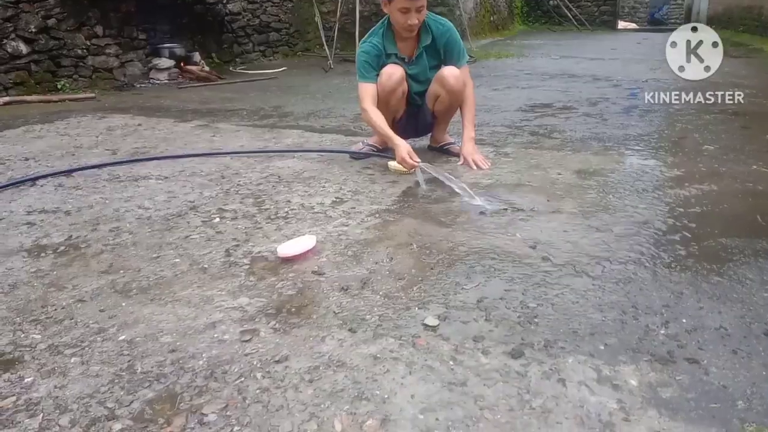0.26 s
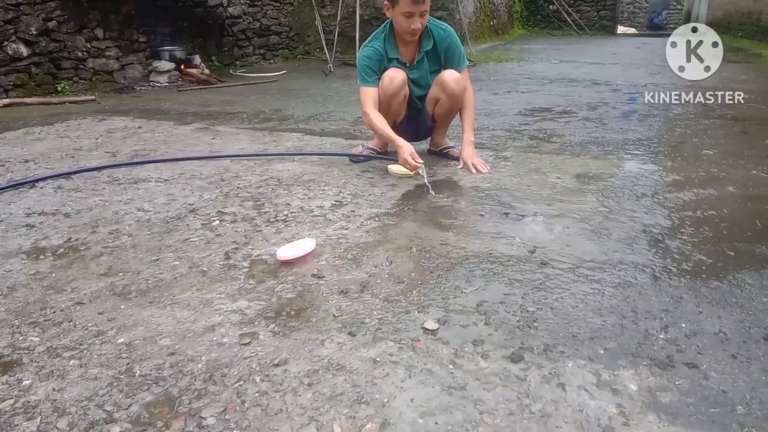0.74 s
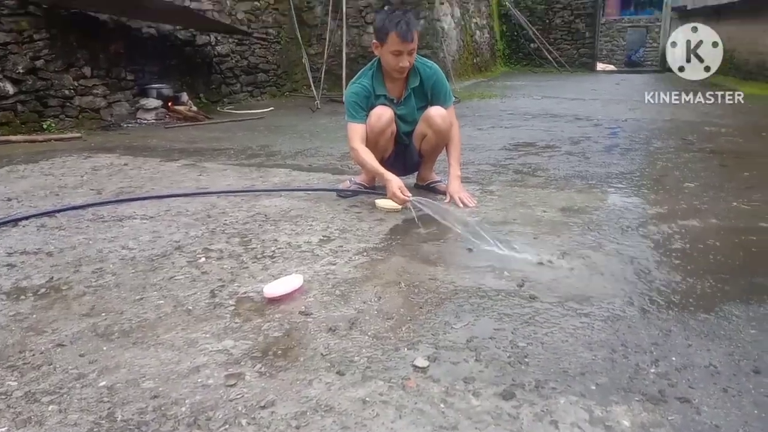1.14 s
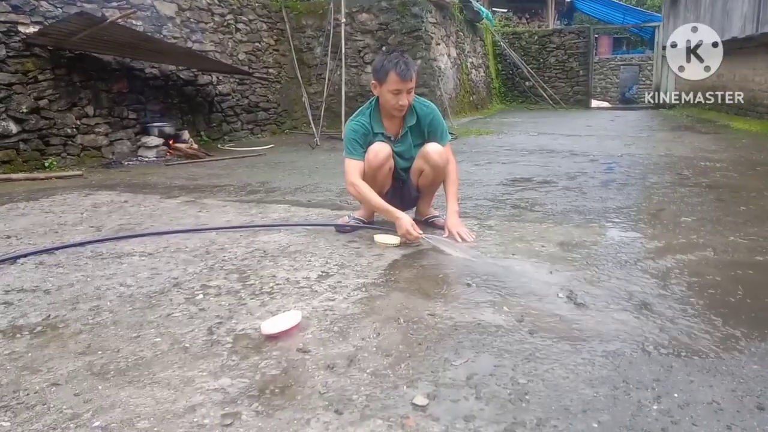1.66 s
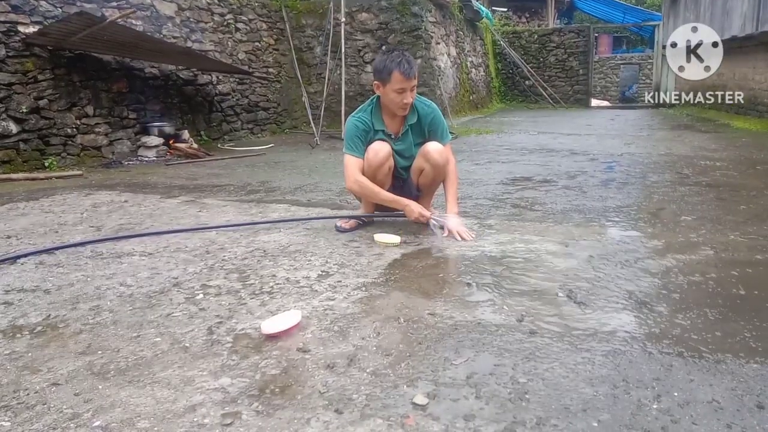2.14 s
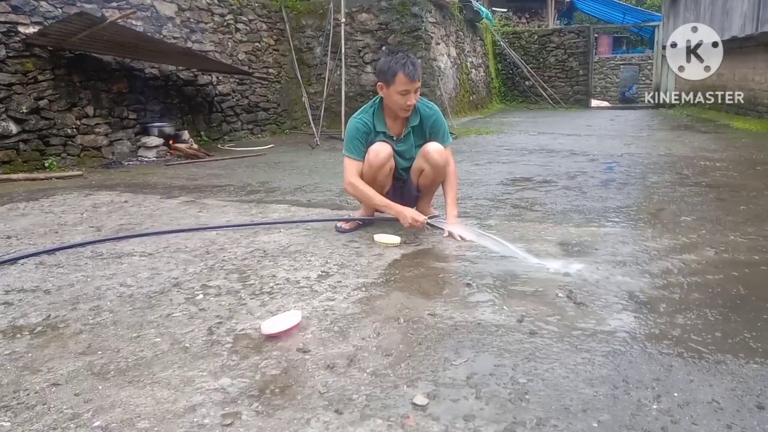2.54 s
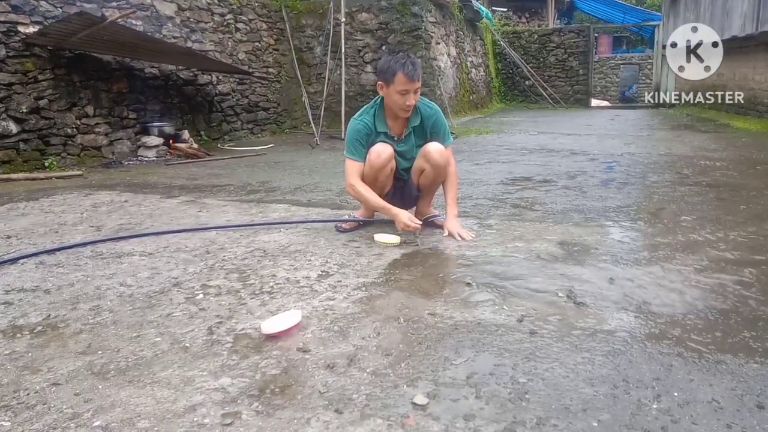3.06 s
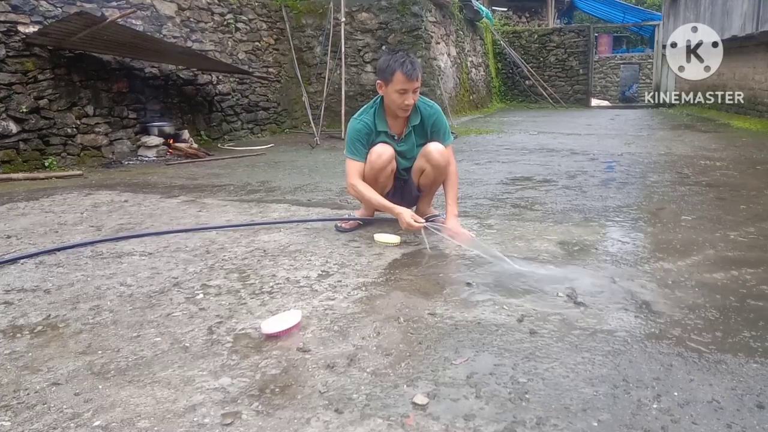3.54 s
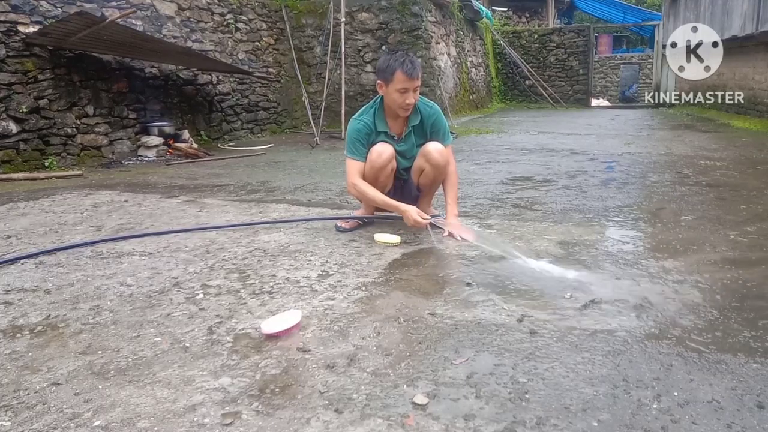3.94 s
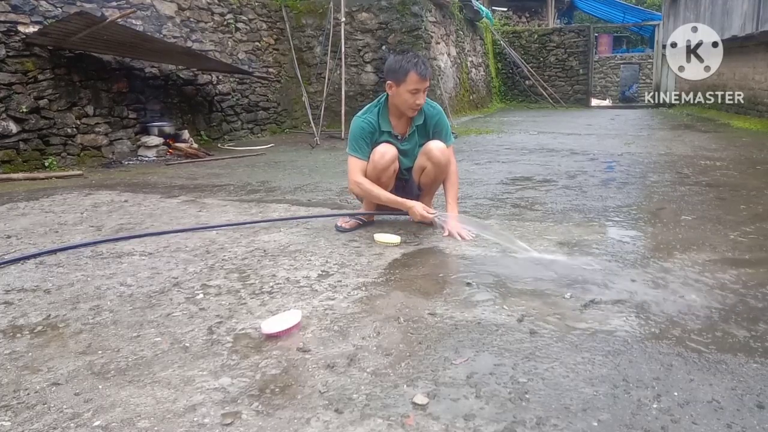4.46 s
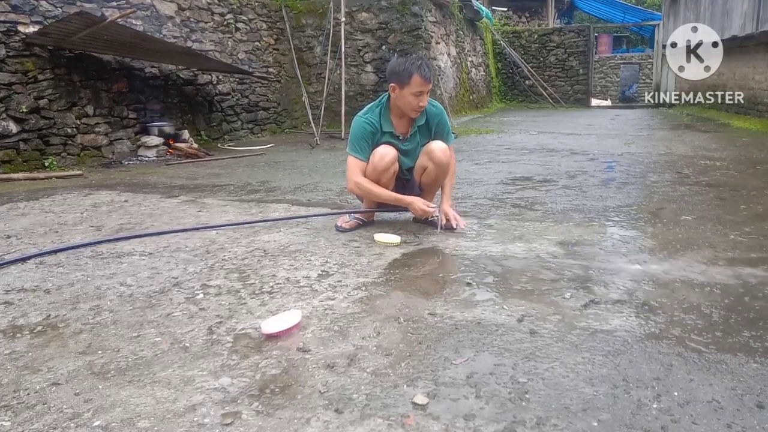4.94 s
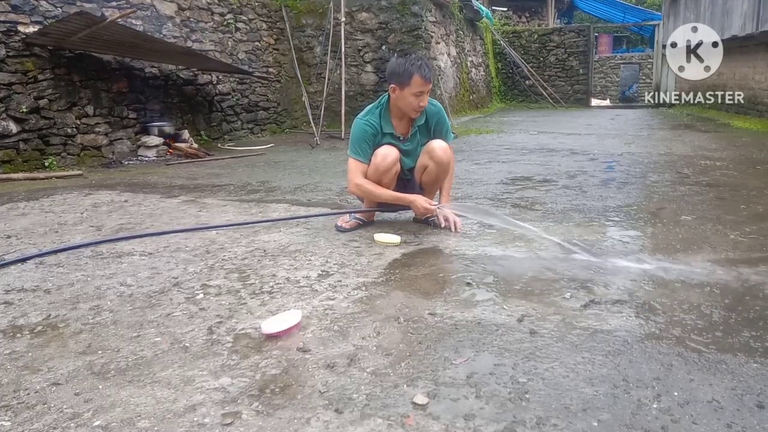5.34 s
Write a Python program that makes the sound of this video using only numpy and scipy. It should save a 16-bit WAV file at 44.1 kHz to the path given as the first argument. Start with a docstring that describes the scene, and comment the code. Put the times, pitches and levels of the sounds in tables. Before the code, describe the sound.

A brush scrapes briefly, then a thin hissing hose sprays a stone-walled yard while unseen wood is struck and insects chirp.

```python
"""Wet yard with brush and hose

A wet concrete yard: a scrub brush rasps through three quick strokes, grains ringing its plastic back,
then a hose sprays the slab in uneven spurts of filtered droplet grains.
Out of sight something wooden is struck again and again, with sharp clacks between: short blows
through resonances, answered by the stone walls as decaying noise.
Cricket song ticks on, in falling chirps, before a chorus and an outdoor rumble of coloured noise."""
import sys
import numpy as np
from scipy import signal
from scipy.fft import rfft, irfft, next_fast_len
from scipy.io import wavfile
from scipy.ndimage import uniform_filter1d, map_coordinates

SR = 44100
rng = np.random.default_rng(int(sys.argv[2]) if len(sys.argv) > 2 else 0)


def master_out(mix):
    """Clip the mix to full scale and print it as 16-bit PCM to the path in sys.argv[1]."""
    frames = np.transpose(np.atleast_2d(mix))
    ceiling = np.clip(frames, -1, 1)
    pcm = np.round(ceiling * 32767).astype(np.int16)
    wavfile.write(sys.argv[1], SR, pcm)


N = 246959  # samples in the scene


def amp(db):
    """Decibels to gain."""
    return 10 ** (np.asarray(db) / 20)


def unit(x):
    """Scaled to rms 1."""
    return x / np.sqrt(np.mean(x ** 2) + 1e-20)


def along(points, hz):
    """(Hz, value) points read on a log frequency axis."""
    point_hz, value = np.transpose(points)
    return np.interp(np.log(hz + 1), np.log(point_hz), value)


def curves(rows):
    """One value per sample for each column after the time."""
    s, *columns = np.transpose(rows)
    return [np.interp(np.arange(N) / SR, s, column) for column in columns]


def wobble(rate):
    """A smooth random curve, rate knots a second."""
    knots = rng.standard_normal(int(N * rate / SR) + 4)
    return map_coordinates(knots, [np.arange(N) * rate / SR])


def filtered(x, response):
    """x shaped by a complex response of frequency."""
    m = next_fast_len(len(x) + 8192)
    return irfft(rfft(x, m) * response(np.fft.rfftfreq(m, 1 / SR)), m)[:len(x)]


def coloured(x, spectrum):
    """x with a (Hz, dB) colour, at rms 1."""
    return unit(filtered(x, lambda hz: amp(along(spectrum, hz))))


def resonate(x, modes):
    """x through parallel (Hz, width Hz, dB) resonances of alternating sign."""
    def response(f):
        total = 0
        for k, (centre, width, db) in enumerate(modes):
            peak = 1j * f * width / (centre * centre - f * f + 1j * f * width)
            total = total + (-1) ** k * amp(db) * peak
        return total
    return filtered(x, response)


def highpass(x, edge_hz):
    """A steep causal bass cut."""
    return signal.sosfilt(signal.butter(4, edge_hz, "high", fs=SR, output="sos"), x)


def grains(rate, spread_db):
    """Tiny impacts of random size at random moments, rate a second on average, at rms 1."""
    hits = rng.random(N) < rate / SR
    return unit(hits * rng.choice([-1, 1], N) * amp(spread_db * rng.standard_normal(N)))


def patchy(x, depth_db):
    """Random patches of gain, some hundred hertz wide and some hundredths of a second long, at rms 1."""
    z = signal.stft(x, nperseg=256)[2]
    field = uniform_filter1d(rng.standard_normal(z.shape), size=3, axis=0)
    field = uniform_filter1d(field, size=7, axis=1)
    return unit(signal.istft(z * amp(depth_db * unit(field)), nperseg=256)[1][:N])


def add(track, s, sound):
    """Mix a sound into the track at time s."""
    part = track[round(s * SR):][:len(sound)]
    part += sound[:len(part)]


def burst(x):
    """Scaled as if its energy filled a hundredth of a second at rms 1."""
    return x * np.sqrt(SR / 100 / np.sum(x ** 2))


# Colour of the low air behind the yard. Each row: frequency in Hz, relative level in dB.
AIR_COLOUR = [(25, -23), (80, -29), (115, -9.5), (160, 2), (300, 2), (450, -5.5), (700, -10), (1200, -16),
              (2150, -15), (2520, -7), (2900, -19), (12000, -25), (16000, -43)]
# A faint tone behind the yard. Each row: time in seconds, pitch in Hz, level in dB before its flutter.
FAINT_TONE = [(4.25, 454, -100), (4.31, 467, -72), (4.45, 450, -67), (4.75, 472, -75), (4.9, 480, -110)]
RUMBLE_DB = -66  # before its slow flutter


def air():
    """Lumpy outdoor rumble of patchy noise, with a faint wavering tone that comes and goes."""
    rumble = patchy(coloured(rng.standard_normal(N), AIR_COLOUR), depth_db=2.5)
    rumble = amp(RUMBLE_DB + 0.97 * wobble(17)) * rumble
    hz, tone_db = curves(FAINT_TONE)
    tone = unit(np.sin(2 * np.pi * np.cumsum(hz) / SR + 1.0 * wobble(30)))
    return rumble + amp(tone_db + 3.3 * wobble(25)) * tone


# Insect chorus over time. Each row: time in seconds, level in dB before its flutter.
CHORUS_LEVEL = [(.5, -56), (1.4, -62), (2.2, -59.5), (2.8, -59), (4, -56.5), (4.4, -60), (5.05, -57),
                (5.6, -61.5)]
# Colour of the chorus. Each row: frequency in Hz, relative level in dB.
CHORUS_COLOUR = [(7800, -31), (8500, -11), (8900, -10), (9600, -2), (10200, -1), (10900, -5), (13000, -29)]
# Cricket song over time. Each row: time in seconds, level in dB before its flutter.
CRICKET_LEVEL = [(.2, -64.5), (.4, -54), (1.1, -64.5), (1.75, -56.5), (1.95, -75), (2.5, -58), (3.7, -62.5),
                 (5.1, -57.5), (5.3, -62.5)]
# Rate of the paired chirps. Each row: time in seconds, chirp pairs per second.
CHIRP_PACE = [(.7, 27.5), (1, 27.9), (1.5, 27.5), (2.6, 27.4), (2.9, 28.9), (3.2, 27.8), (4.6, 27.1),
              (5.2, 27.4)]


def insects():
    """Cricket song: two ticks of falling pitch in each chirp pair; other insects blur into a high band."""
    pair_rate, = curves(CHIRP_PACE)
    age = (np.cumsum(pair_rate) / SR + .2) % 1 / pair_rate  # seconds since the pair began
    song = np.zeros(N)
    for u in (age - .006, age - .015):
        # 9400 Hz at the tick's peak, falling 130 Hz per millisecond
        cycles = 9400 * u - 130000 * u * u / 2
        song += np.exp(-abs(u) / 0.0016) * np.sin(2 * np.pi * cycles + 2 * wobble(36))
    cricket = amp(curves(CRICKET_LEVEL)[0] + wobble(22.32)) * unit(song)
    chorus = coloured(rng.standard_normal(N), CHORUS_COLOUR)
    return cricket + amp(curves(CHORUS_LEVEL)[0] + 1.6 * wobble(130)) * chorus


# How long the stone walls ring. Each row: frequency in Hz, time to fall by 60 dB in seconds.
WALL_DECAY = [(200, 0.22), (500, 0.14), (2000, 0.16), (6000, 0.19), (14000, 0.15)]


def yard(x, t, wet_db, gap=.009):
    """The sound and the scattered answer of the stone walls: decaying noise after a gap in seconds."""
    hz, age, z = signal.stft(rng.standard_normal(len(t)), SR, nperseg=256)
    decay = amp(-60 * age / along(WALL_DECAY, hz)[:, None])
    tail = signal.istft(z * decay, SR, nperseg=256)[1][:len(t)]
    tail = tail * (t > gap)
    return x + amp(wet_db) * signal.fftconvolve(x, tail / np.linalg.norm(tail))[:len(t)]


def contact(t, scatter, t60):
    """One sharp blow with a brief crunch of the surfaces, lumpy in steps of 2 ms."""
    lumps = np.repeat(amp(3.55 * rng.standard_normal(len(t))), SR // 500)[:len(t)]
    crunch = lumps * rng.standard_normal(len(t)) * amp(-60 * t / t60)
    return scatter * crunch / np.linalg.norm(crunch) - (t == 0)


# Small hard clacks in the yard. Each row: start in seconds, ring level in dB, most excited pitch in Hz,
# width of the excited band in Hz, high ping level in dB; levels are before the walls answer.
CLACK_HITS = [(0.2629, -35, 3400, 1750, -76), (0.8815, -41, 2540, 4030, -58),
              (2.1776, -35, 4400, 6900, -41.5), (3.132, -53.5, 4560, 1200, -62),
              (4.031, -52, 4060, 4020, -52.5), (4.778, -62.5, 3160, 4000, -69),
              (5.547, -49, 3070, 4000, -60)]
# Resonances of the hard pieces. Each row: pitch in Hz, width in Hz, relative level in dB.
CLACK_RESONANCES = [(1540, 470, 0), (2540, 220, 3), (3720, 610, -1.5), (4320, 280, 3), (4850, 400, -0.5),
                    (7150, 510, -4), (9000, 660, -15)]


def clacks():
    """Small hard pieces meet: a brief ring of their resonances and a high ping, then the walls."""
    out, t = np.zeros(N), np.arange(SR // 3) / SR
    for s, ring_db, hz, width_hz, ping_db in CLACK_HITS:
        blow = contact(t, scatter=1.0, t60=0.013)
        ring = resonate(resonate(blow, CLACK_RESONANCES), [(hz, width_hz, 0)])
        ring = burst(highpass(ring, edge_hz=1800))
        ping = burst(highpass(resonate(blow, [(11250, 290, 0)]), edge_hz=5900))
        add(out, s, yard(amp(ring_db) * ring + amp(ping_db) * ping, t, wet_db=-9.5))
    return out


# Wooden knocks out of sight. Each row: start in seconds, hollow pitch in Hz, dry wood ring in dB
# (the hollow note lies 2.1 dB under it), ground thud in dB, crack in dB (2.8 dB is taken off);
# levels are before the walls answer.
WOOD_KNOCKS = [(0.7004, 734, -38.5, -53.5, -36), (0.966, 780, -38.5, -53, -40),
               (0.9934, 804, -51, -75, -36.5), (1.3712, 795, -37.5, -51.5, -35.5),
               (1.3965, 826, -51, -78, -35.5), (1.498, 1624, -37.5, -60, -38),
               (2.0684, 420, -39, -42.5, -37), (2.511, 1850, -53, -65, -49),
               (2.9618, 860, -43.5, -67, -36.5), (2.972, 420, -45, -45, -39.5),
               (4.075, 454, -43, -56.5, -41), (4.089, 970, -45, -71, -39), (4.114, 694, -69, -71, -41.5),
               (4.122, 507, -46.5, -64, -38.5), (4.2464, 434, -40.5, -42.5, -35.5),
               (4.3215, 915, -51.5, -73, -43.5), (4.5266, 546, -33.5, -43.5, -33.5),
               (4.884, 535, -36, -42.5, -38)]
# Dry ring of the wood. Each row: pitch in Hz, width in Hz, relative level in dB.
WOOD_RESONANCES = [(1384, 400, -3), (1850, 530, -2.5), (2488, 169, 1), (3770, 330, -10)]
# Colour of the splintery crack. Each row: frequency in Hz, relative level in dB.
CRACK_COLOUR = [(2500, -17), (4200, 1.5), (5500, 2.5), (6500, 0.5), (8000, 3.5), (9500, 5), (11800, -1),
                (13200, -8), (16000, -29)]


def knocks():
    """Each blow gives a ground thud, a hollow note of its own pitch, a dry ring and a splintery crack."""
    out, t = np.zeros(N), np.arange(SR // 3) / SR
    for s, hz, wood_db, thud_db, crack_db in WOOD_KNOCKS:
        thud = resonate(contact(t, scatter=1.1, t60=0.069), [(253, 147, -1.1), (420, 237, 0.091)])
        thud = burst(highpass(thud, edge_hz=185))
        hollow = resonate(contact(t, scatter=1.0, t60=0.078), [(hz, 120, 0)])
        hollow = burst(highpass(hollow, edge_hz=265))
        ring = resonate(contact(t, scatter=0.88, t60=0.037), WOOD_RESONANCES)
        ring = burst(highpass(ring, edge_hz=1050))
        # the splintering builds up within a millisecond or two
        build_up = 1.2 - np.exp(-t / 0.00043)
        crack = burst(coloured(contact(t, scatter=6, t60=0.03) * build_up, CRACK_COLOUR))
        low = yard(amp(thud_db) * thud, t, wet_db=1.0)
        middle = yard(amp(wood_db - 2.1) * hollow, t, wet_db=-9.5)
        high = yard(amp(wood_db) * ring + amp(crack_db - 2.8) * crack, t, wet_db=-6.0)
        add(out, s, low + middle + high)
    return out


# Soft liquid blips. Each row: start in seconds, level in dB, starting pitch in Hz.
BUBBLES = [(0.322, -63.5, 1380), (4.684, -64, 1670)]


def blips():
    """A large bubble sings briefly, rising a little in pitch."""
    out, t = np.zeros(N), np.arange(SR // 8) / SR
    for s, db, hz in BUBBLES:
        tone = np.sin(2 * np.pi * hz * t * (1 + 0.64 * t))
        add(out, s, amp(db) * burst(t * np.exp(-t / .011) * tone))
    return out


# Slugs of water on the slab. Each row: start in seconds, level in dB (1 dB is taken off), pitch in Hz.
WATER_SLAPS = [(0.5162, -49.5, 6000), (0.932, -47.5, 6900), (1.458, -43, 6340), (1.663, -61, 7200),
               (2.424, -52.5, 7500), (2.8669, -47.5, 8100), (3.669, -48.5, 6940), (3.939, -53, 5000),
               (5.026, -64.5, 5330), (5.11, -62, 7700)]


def slaps():
    """A slug of water lands as a short swell of spatter: noise through a doubled resonance."""
    out, t = np.zeros(N), np.arange(SR // 8) / SR
    for s, db, hz in WATER_SLAPS:
        swell = (1 - np.exp(-t / 0.0025)) * amp(-60 * t / 0.03)
        band = [(hz, 2400, 0)]
        spatter = resonate(resonate(swell * rng.standard_normal(len(t)), band), band)
        add(out, s, amp(db - 1.0) * burst(spatter))
    return out


# Strokes of the scrub brush. Each row: fastest moment in seconds, half length in seconds,
# bristle rasp in dB, brush body in dB; the rasp is before its flutter, the body before its bass cut.
BRUSH_STROKES = [(0.009, 0.037, -34, -39.5), (0.101, 0.016, -30, -45.5), (0.195, 0.027, -42, -53.5)]
# Colour of the bristle rasp. Each row: frequency in Hz, relative level in dB.
BRISTLE_COLOUR = [(530, -39), (900, -36), (1090, -44), (2090, -45), (2440, -12.5), (2890, -15), (3630, -8),
                  (4790, -9), (7950, -3.5), (12300, -11), (13300, -20), (14500, -18), (16000, -40)]
STROKE_FADE_S = 0.023  # how gradually the hand gains and loses speed


def brush():
    """Bristles flick over grit by the thousand and ring the plastic back; each stroke swells and fades."""
    t = np.arange(N) / SR
    rasp_level, body_level = np.zeros(N), np.zeros(N)
    for s, half, rasp_db, body_db in BRUSH_STROKES:
        speed = .5 - .5 * np.tanh((abs(t - s) - half) / STROKE_FADE_S)
        rasp_level += amp(rasp_db) * speed
        body_level += amp(body_db) * speed ** 2
    rasp = coloured(grains(rate=20000, spread_db=4.0), BRISTLE_COLOUR)
    body = unit(resonate(grains(rate=5600, spread_db=1.5), [(2540, 155, 0)]))
    return rasp_level * amp(0.59 * wobble(235)) * rasp + body_level * highpass(body, edge_hz=1100)


# Spurts of the hose on the slab. Each row: start in seconds, length in seconds,
# level in dB that the jet approaches, before its flutter.
HOSE_SPURTS = [(0.43, 0.28, -61.5), (0.664, .11, -55), (0.924, 0.33, -49.5), (1.266, 0.26, -50.5),
               (1.547, 0.19, -62.5), (2.41, 0.3, -58), (2.765, 0.26, -54), (3.172, 0.069, -54),
               (3.452, 0.15, -65), (3.641, 0.23, -56), (3.903, 0.28, -55), (4.222, 0.11, -53),
               (4.36, 0.26, -62.5), (4.884, .07, -57), (5.13, 0.12, -67), (5.32, 0.24, -59)]
SPURT_RISE_S, SPURT_FALL_S = 0.011, 0.013  # time constants of the jet's arrival and retreat
DRIBBLE_DB = -77.5  # the jet between spurts, before its flutter


def jet_strength():
    """Level of the jet in dB: every spurt rises, holds and falls back to a dribble."""
    t = np.arange(N) / SR
    level = np.full(N, amp(DRIBBLE_DB))
    for s, length, db in HOSE_SPURTS:
        rise = 1 - np.exp(-np.maximum(t - s, 0) / SPURT_RISE_S)
        fall = np.exp(-np.maximum(t - s - length, 0) / SPURT_FALL_S)
        level = np.maximum(level, amp(db) * rise * fall)
    return 20 * np.log10(level)


# Colours of the jet on the slab, its spray, its mist and its puddle splashes.
# Each row: frequency in Hz, relative level in dB.
JET_COLOUR = [(3000, -39), (4400, -7.5), (5100, -1), (5400, -8), (5850, 8), (6500, -5.5), (7250, 8.5),
              (8050, -3), (8600, -7), (10500, -22), (13000, -26)]
SPRAY_COLOUR = [(6500, -34), (8500, -2), (10000, -8), (10900, -1.5), (11800, -11.5), (12400, -5),
                (13200, -49)]
MIST_COLOUR = [(5000, -40), (11000, -0.5), (12500, 4), (13200, -8), (14200, -2), (15400, -16), (16000, -7)]
SPLASH_COLOUR = [(1100, -27), (2000, -9.5), (2600, -0.5), (3500, -1.5), (4600, 2), (6000, -6), (9000, -19)]
# Mist at a typical spurt. Each row: time in seconds, level in dB before its flutter.
MIST_AT_FULL_JET = [(.3, -77), (1.1, -72), (1.45, -60), (1.8, -75), (2.9, -73), (3.5, -64.5), (4.3, -65),
                    (4.95, -80), (5.2, -54.5), (5.5, -55.5)]
# The jet crosses a puddle. Each row: middle in seconds, half length in seconds, level in dB before flutter.
PUDDLE_CROSSINGS = [(0.503, 0.085, -67.5), (1.168, 0.042, -52.5), (1.432, 0.04, -63), (2.59, 0.024, -54.5),
                    (2.892, 0.039, -53), (3.25, 0.027, -62), (3.749, 0.05, -55.5), (5.4, 0.2, -65.5)]
FULL_JET_DB = -53  # a typical spurt; mist, spray and splash levels are given at this strength
SPRAY_DB, SPLASH_DB = -57, -74.5  # before their flutter
SPRAY_FOLLOWS, MIST_FOLLOWS = 1, 0.35  # dB per dB of jet


def hose():
    """The jet spatters on the slab, mist and spray hiss along, and coarser drops splash in the puddles."""
    t = np.arange(N) / SR
    jet_db = jet_strength()
    push_db = jet_db - FULL_JET_DB
    pooled = amp(SPLASH_DB + push_db)
    for s, half, db in PUDDLE_CROSSINGS:
        pooled = pooled + amp(db) * np.exp(-.5 * ((t - s) / half) ** 2)
    mist_db = curves(MIST_AT_FULL_JET)[0] + MIST_FOLLOWS * push_db
    mist = amp(mist_db) * coloured(grains(rate=10000, spread_db=4), MIST_COLOUR)
    spray_db = SPRAY_DB + SPRAY_FOLLOWS * push_db
    spray = amp(spray_db) * coloured(grains(rate=9800, spread_db=9.5), SPRAY_COLOUR)
    jet = amp(jet_db) * patchy(coloured(grains(rate=14000, spread_db=6.0), JET_COLOUR), depth_db=4.5)
    drops = coloured(grains(rate=3700, spread_db=3.5), SPLASH_COLOUR)
    splash = pooled * patchy(drops, depth_db=5.5)
    return amp(0.57 * wobble(42)) * (mist + spray) + amp(1.1 * wobble(42)) * (jet + splash)


# Colour of the faint noise of opposite sign in the two channels.
# Each row: frequency in Hz, relative level in dB.
SIDE_NOISE_COLOUR = [(2500, 3.5), (8500, -12.5), (12000, -14)]


def scene():
    """All sources reach both channels alike; only a faint noise, of opposite sign in each, differs."""
    mono = air() + insects() + clacks() + knocks() + blips() + slaps() + brush() + hose()
    side = amp(-86.0) * coloured(rng.standard_normal(N), SIDE_NOISE_COLOUR)
    return np.array([mono + side, mono - side])


TOP_HZ = 15850  # upper band limit


def record(dry):
    """Nothing above the band limit is kept."""
    return np.array([filtered(channel, lambda hz: hz < TOP_HZ) for channel in dry])


dry = scene()
out = record(dry)
master_out(out)
```